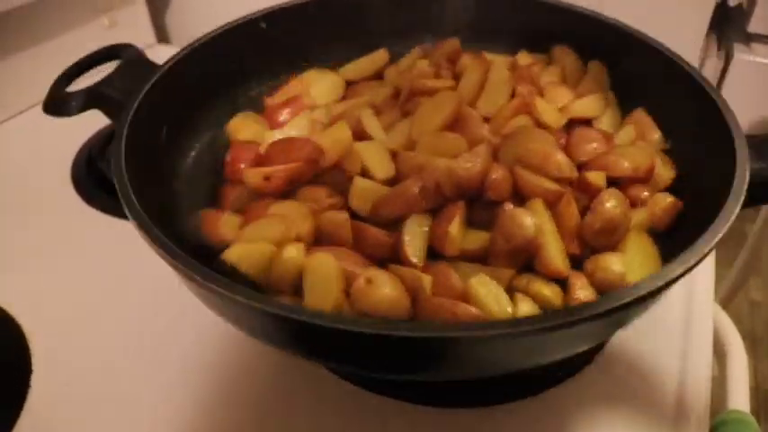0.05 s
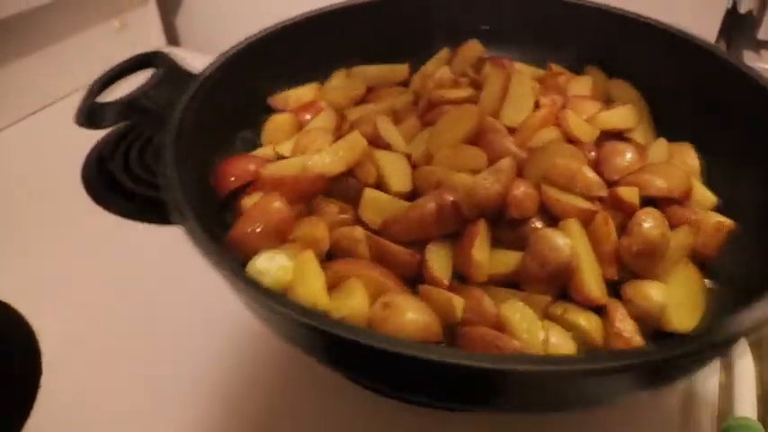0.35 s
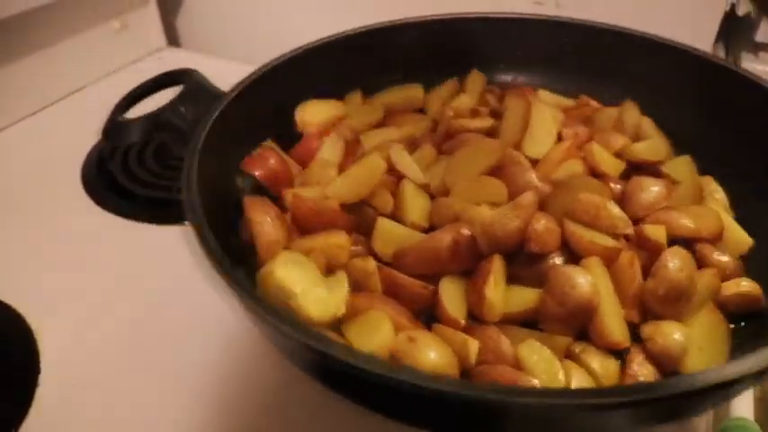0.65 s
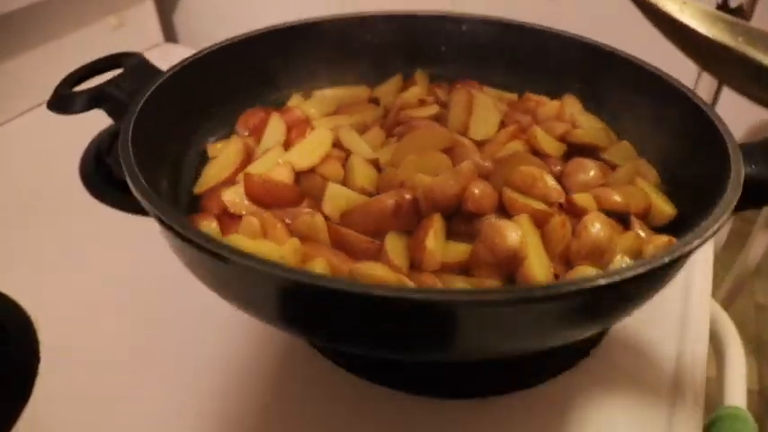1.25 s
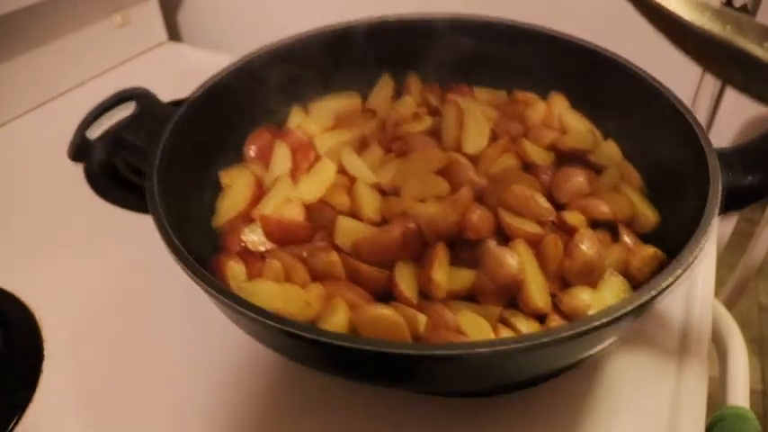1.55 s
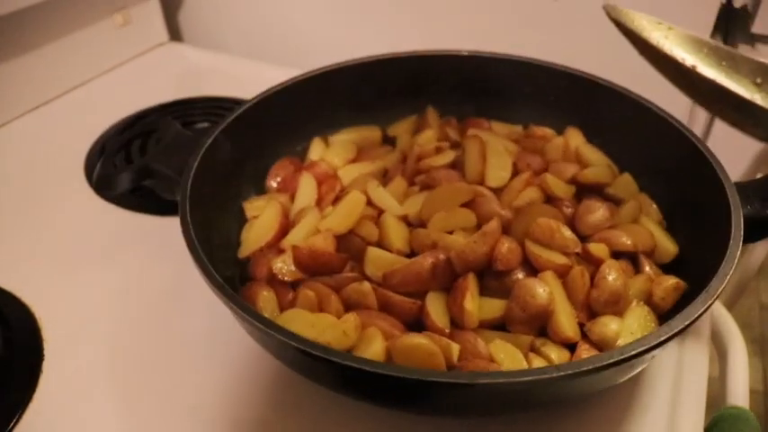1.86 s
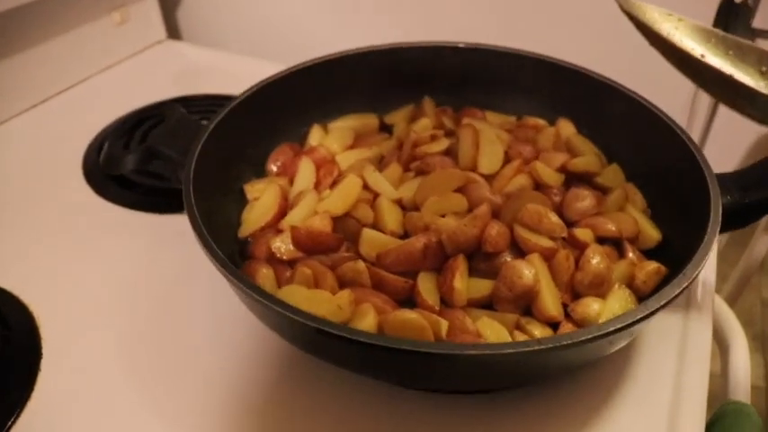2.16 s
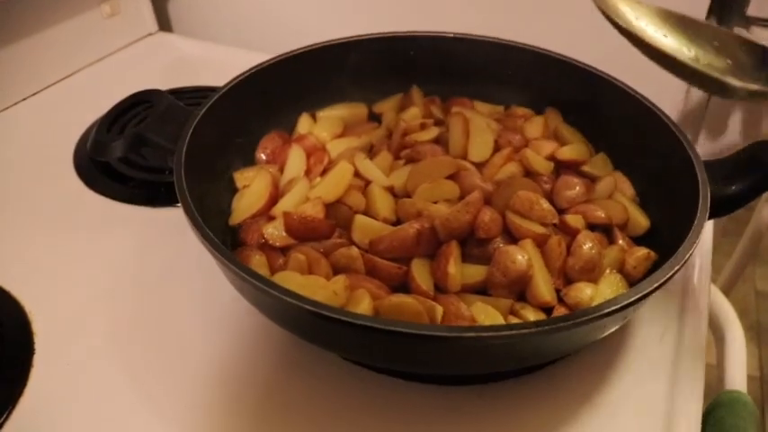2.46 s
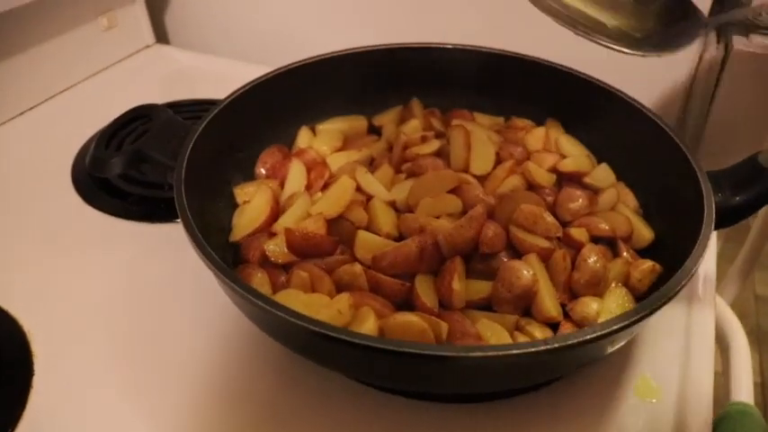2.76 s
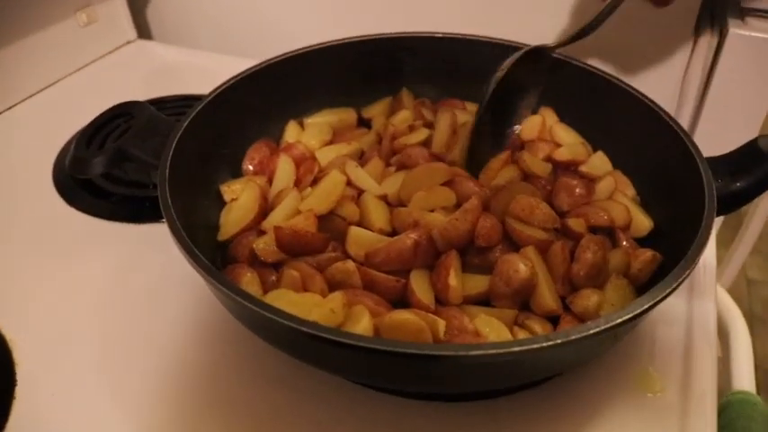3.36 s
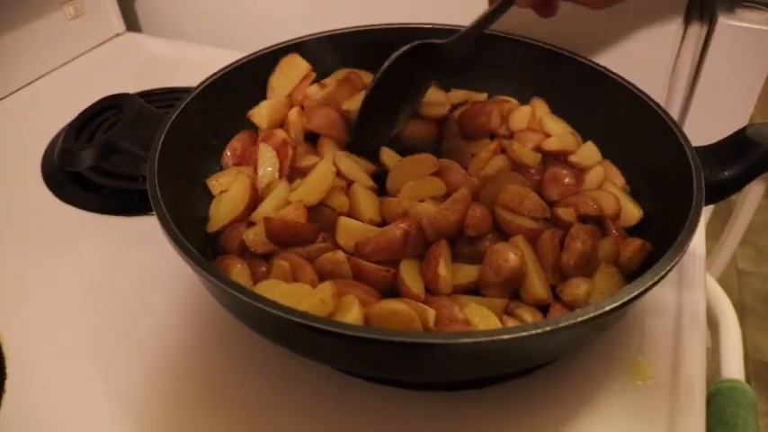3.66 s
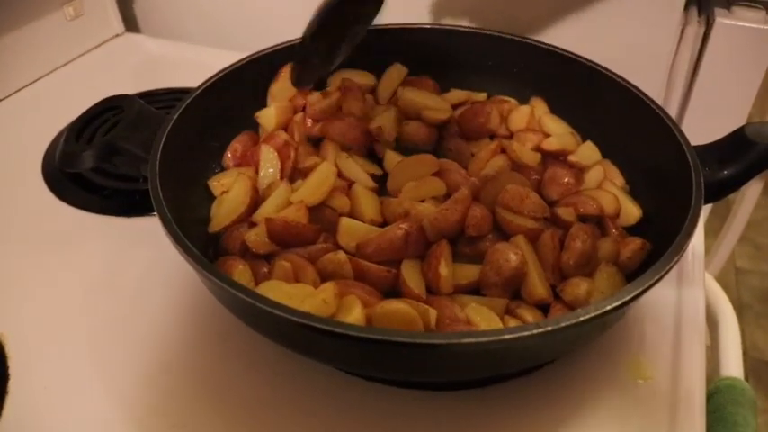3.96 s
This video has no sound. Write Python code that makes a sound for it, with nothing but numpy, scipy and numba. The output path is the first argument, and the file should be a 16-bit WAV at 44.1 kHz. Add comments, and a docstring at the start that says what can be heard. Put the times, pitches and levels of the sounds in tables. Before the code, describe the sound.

Potato wedges fry and spit in oil as the pan knocks and a spoon strikes it.

```python
"""Potato wedges frying in a pan

Countless steam bubbles burst and ring in the oil, merging into a sizzle, and single drops spit.
The pan knocks and slides on an electric burner; a spoon digs in and strikes it, exciting its modes.
An appliance hums behind. The limiter of a nearby phone ducks the sound after the loudest cracks."""
import sys
import numpy as np
from scipy import signal
from scipy.fft import rfft, irfft
from scipy.io import wavfile
from numba import njit

SR = 44100
rng = np.random.default_rng(int(sys.argv[2]) if len(sys.argv) > 2 else 0)


def put_to_file(sound):
    """Save the sound as 16-bit audio at rate SR, in the file named by the first command-line argument."""
    columns = np.atleast_2d(sound).T  # one column per channel
    safe = np.clip(columns, -1, 1)
    whole_steps = np.round(safe * 32767)
    wavfile.write(sys.argv[1], SR, whole_steps.astype(np.int16))


N = 176400


def sizzle():
    """Superposition: bursting films click, small bubbles ring, and the pan wall smears both into hiss."""
    # Spectral envelope of the frying. Each row: frequency in Hz, gain in dB.
    frying_spectrum = [(240, -23), (400, -10), (481, -11), (636, -7.5), (801, -7), (1600, -5), (1990, -4),
                       (2930, -2.5), (3750, -3), (4800, -3), (5960, -7), (8240, -4), (10500, -12.5),
                       (13500, -9), (16000, -23)]
    # Course of the sizzle. Each row: time in seconds, then low-mid, mid, treble and top level in dB.
    band_levels = [(0.0, -34.5, -23, -24.5, -31), (0.42, -34.5, -23.5, -26.5, -33),
                   (0.64, -33, -21.5, -26, -33.5), (0.8, -34, -24, -27, -34),
                   (1.85, -40.5, -27, -31.5, -39.5), (2.35, -34.5, -28, -31.5, -38.5),
                   (2.48, -39.5, -27.5, -32, -39.5), (3.52, -38.5, -27.5, -32, -39.5),
                   (4.0, -40, -27.5, -30.5, -37)]
    # The five edges of those four bands, in Hz.
    edges_hz = (300, 1500, 5500, 9500, 17000)
    # Gain added to each band's level, in dB.
    trims_db = (2.1, 0.18, 1.45, 1.6)
    bubbles_per_s, ring_cycles, bubble_db, wall_db = 2500, 82, -4.5, 1.5
    bubbles = np.zeros(N)
    for when, pitch, size in rng.random((int(bubbles_per_s * N / SR), 3)):
        hz = 500 + 15000 * pitch ** 1.5
        amplitude = hz ** .7 * undb(-3.4 * np.log(size + .002))  # many faint, a few loud
        add(bubbles, when * N / SR, amplitude * ring(hz, ring_cycles / hz, size=1024))
    fry = unit(clicks(per_s=14000, spread_db=3.2)) + undb(bubble_db) * unit(bubbles)
    smeared_power = signal.fftconvolve(fry ** 2, fade(t60=0.031, size=2048))[:N]
    scatter = np.sqrt(np.abs(smeared_power)) * noise()
    fry = fry + undb(wall_db) * unit(scatter)
    spectrum, freqs = rfft(colour(fry, frying_spectrum)), np.fft.rfftfreq(N, 1 / SR)
    times, *levels_db = np.array(band_levels).T
    out, t = np.zeros(N), np.arange(N) / SR
    for low, high, db, trim_db in zip(edges_hz, edges_hz[1:], levels_db, trims_db):
        part = irfft(spectrum * (freqs >= low) * (freqs < high), N)
        out += unit(part) * undb(np.interp(t, times, db) + trim_db)
    return out


def drop(hz, cycles, splash_db):
    """An oil drop snaps and splashes; bandwidth falls with ring time, so more cycles give clearer pitch."""
    snap = band(ring(hz, cycles / hz, size=8192), hz, width=1.1)
    splash = burst(hz, width=3.5 / cycles, t60=0.0096)
    return snap / np.max(np.abs(snap)) + undb(splash_db) * splash


def spits():
    """Impulsive sources: large drops burst singly, and smaller ones crackle at random between them."""
    # Each row: start in seconds, level in dB, pitch in Hz, cycles of ringing, relative splash in dB.
    large_drops = [(0.0213, -3, 8500, 9.3, -15), (0.1118, 1.5, 8300, 9, -17), (0.2161, 6, 3100, 8.8, -15),
                   (0.2166, -7.5, 1120, 2.5, -8), (0.2173, -4, 1800, 8.9, -7), (0.3102, -6, 4500, 8.6, -10),
                   (0.526, -11.5, 3000, 30, -7), (0.691, 6, 4370, 2.5, -8.5), (1.0863, -8, 11000, 6, -11),
                   (1.385, -1.5, 5160, 2.5, -13), (1.7028, -9, 7800, 48, -6),
                   (2.0227, -7.5, 5500, 10, -5.5), (2.2756, -3.5, 3500, 13, -10.5),
                   (2.4108, -4, 4370, 7.3, -12), (2.44, -9, 1900, 3.9, -8), (2.985, -7.5, 4670, 38, -5.5),
                   (3.1427, -6, 3070, 15, -2.5), (3.169, -5, 7800, 6.5, -12.5), (3.396, -7.5, 9200, 5, -14),
                   (3.759, -7, 7600, 7.4, -10.5), (3.82, -10, 7300, 11, -7), (3.871, -8, 3060, 5.3, -7),
                   (3.934, -11, 12000, 8, -8)]
    crackles_per_s, low_hz, high_hz = 22, 3150, 13000
    out = np.zeros(N)
    for start, db, hz, cycles, splash_db in large_drops:
        add(out, start, undb(db) * drop(hz, cycles, splash_db))
    for when, pitch, size in rng.random((int(crackles_per_s * N / SR), 3)):
        hz = low_hz * (high_hz / low_hz) ** pitch
        add(out, when * N / SR, undb(-19 + 8 * size) * drop(hz, cycles=5.7, splash_db=-24))
    return out


def simmer():
    """Bubble resonance: like-sized bubbles under the wedges fizz in one narrow band and die down."""
    # Each row: time in seconds, level in dB.
    fizz_levels = [(0, -34), (.4, -35), (.56, -30.5), (.8, -31.5), (1.55, -37), (1.8, -62), (4, -53)]
    fizz = unit(band(clicks(per_s=2500, spread_db=1.7), hz=2970, width=0.11))
    return fizz * undb(np.interp(np.arange(N) / SR, *np.array(fizz_levels).T))


def pan_ring(hz, width):
    """Modal response: a contact drives mainly the pan's modes in a band around hz; the peak is 1."""
    # Modes of the loaded pan. Each row: frequency in Hz, level in dB, 60 dB decay time in seconds.
    modes = [(220, -8, 0.065), (335, -9, 0.055), (465, 1, 0.052), (735, -2.5, 0.039), (1087, -5.5, 0.063),
             (1242, -0.5, 0.028), (1395, -0.5, 0.033), (1520, -6, 0.045), (1641, -4, 0.078),
             (2030, -11, 0.027), (3220, 0.5, 0.038), (4490, 3, 0.022), (4700, 4.5, 0.029)]
    body = np.zeros(8192)
    for mode_hz, db, t60 in modes:
        detune, polarity = rng.standard_normal(2)
        body += np.sign(polarity) * undb(db) * ring(mode_hz * (1 + 0.0059 * detune), t60, len(body))
    body = band(body, hz, width, order=2)
    return body / np.max(np.abs(body))


def knocks():
    """Impact excitation: the pan hits the burner with a dry crack and a ring damped by the food."""
    # Each row: start in seconds, level in dB, centre frequency of the contact in Hz.
    contacts = [(1.7855, -6, 1610), (1.787, -8, 600), (1.7937, -6, 430), (1.7983, -13, 1490),
                (1.822, -14, 550), (2.1276, -8.5, 1480), (2.133, -6, 1900), (2.1487, -11, 1340),
                (2.2255, -10, 1300), (2.2297, -11, 2090), (2.236, -15, 650), (2.286, -18, 900),
                (2.306, -18, 950), (2.3378, -19.5, 1830), (2.363, -20, 1200), (2.38, -24, 500),
                (2.401, -15.5, 1200)]
    out, width = np.zeros(N), 1.73
    for start, db, hz in contacts:
        crack = band(burst(hz, width, t60=0.038), hz=930, width=5.4, order=3) / 2
        add(out, start, undb(db) * (pan_ring(hz, width) + undb(2.5) * crack))
    return out


def spoon():
    """Damped and hard impacts: the spoon knocks through the potatoes, then clacks on the bare pan."""
    # Each row: start in seconds, level in dB, pitch in Hz, bandwidth as a share of the pitch,
    # 60 dB decay time in seconds, relative level of the pan's ring in dB.
    blows = [(3.579, 1, 1280, 0.91, 0.029, -1), (3.6236, 6, 3020, 1.7, 0.027, -21),
             (3.6252, -11, 280, 1.1, .012, -30), (3.625, 4.5, 5900, 0.087, 0.019, -35),
             (3.683, -20.5, 1140, 0.38, 0.032, -4)]
    out = np.zeros(N)
    for start, db, hz, width, t60, ring_db in blows:
        clack = band(burst(hz, width, t60), hz, width=2.5)
        add(out, start, undb(db) * (clack + undb(ring_db) * pan_ring(hz, width / 2)))
    return out


def slides():
    """Stick-slip friction: pan and spoon drag in many small catches."""
    # Each row: start and length in seconds, level in dB, centre in Hz, bandwidth as a share of it.
    drags = [(1.793, 0.14, -30, 473, 2.3), (2.214, 0.27, -30.5, 780, 3), (2.354, 0.085, -34, 95, 2.4),
             (3.59, 0.042, -23, 900, 0.39), (3.67, 0.058, -33.5, 870, 0.21), (3.709, 0.055, -32, 385, 0.47)]
    out, t, ramp_s = np.zeros(N), np.arange(N) / SR, 0.027
    for start, length, db, hz, width in drags:
        gate = np.clip(np.minimum(t - start, start + length - t) / ramp_s + .5, 0, 1)
        catches = clicks(per_s=500, spread_db=0.83)
        out += undb(db) * gate * unit(band(catches, hz, width, order=2))
    return out


def bumps():
    """Damped oscillations far down in the bass are heard as soft thuds."""
    # Each row: start in seconds, level in dB, pitch in Hz.
    thuds = [(1.83, -34, 40), (2.378, -32, 80), (2.835, -38.5, 36), (2.88, -39, 36), (3.39, -37, 35.7)]
    out = np.zeros(N)
    for start, db, hz in thuds:
        add(out, start, undb(db) * ring(hz, t60=0.17))
    return out


def appliance():
    """A line spectrum on a continuous one: steady motor tones over a hollow rush of air."""
    # Motor tones. Each row: frequency in Hz, rms level in dB.
    motor_tones = [(48.5, -54.5), (70, -52), (87.5, -55), (232, -53), (250, -60)]
    # Spectral envelope of the air. Each row: frequency in Hz, gain in dB.
    air_spectrum = [(25, -26), (60, -8), (115, -15), (142, -6), (180, -12.5), (215, -7), (245, 2),
                    (285, -4.5), (340, -9), (600, -22.5), (2000, -25)]
    t = np.arange(N) / SR
    hum = sum(np.sqrt(2) * undb(db) * np.sin(2 * np.pi * (hz * t + rng.random()))
              for hz, db in motor_tones)
    return hum + undb(-37) * unit(colour(noise(), air_spectrum))


def kitchen(x):
    """Reverberation: the dense reflections of a small room form a short, dull tail."""
    decay, top_hz = fade(t60=0.42), 2650
    tail = signal.sosfilt(signal.butter(2, top_hz, fs=SR, output="sos"), noise()) * decay
    return undb(-7.5) * signal.fftconvolve(x, tail / np.sqrt(np.sum(decay ** 2)))[:N]


def undb(db):
    """Amplitude ratio for a level in decibels."""
    return 10 ** (np.asarray(db) / 20)


def unit(x):
    """Normalisation to rms 1."""
    return x / np.sqrt(np.mean(x ** 2) + 1e-20)


def noise():
    """Gaussian white noise as long as the scene."""
    return rng.standard_normal(N)


def fade(t60, size=N):
    """Exponential decay by 60 dB in t60 seconds."""
    return np.exp(-np.log(1000) * np.arange(size) / SR / t60)


def ring(hz, t60, size=N):
    """Free vibration of one damped mode."""
    return np.sin(2 * np.pi * hz * np.arange(size) / SR) * fade(t60, size)


def band(x, hz, width, order=1):
    """Band-pass filtering around hz; the width is a share of hz."""
    edge = width / 2 + np.sqrt(1 + width ** 2 / 4)
    top = min(hz * edge, SR / 2 - 1000)
    return signal.sosfilt(signal.butter(order, [hz / edge, top], "band", fs=SR, output="sos"), x)


def colour(x, points):
    """Spectral shaping by (Hz, dB) points joined on a logarithmic frequency axis."""
    hz, db = np.array(points).T
    gain_db = np.interp(np.log(np.fft.rfftfreq(N, 1 / SR) + 1), np.log(hz), db)
    return irfft(rfft(x) * undb(gain_db), N)


def add(out, start, x):
    """Superposition of x on out, from start in seconds."""
    i = int(start * SR)
    out[i:i + len(x)] += x[:N - i]


def clicks(per_s, spread_db):
    """A Poisson train of impulses: many small, a few large."""
    occurs = rng.random(N) < per_s / SR
    size = np.minimum(rng.exponential(size=N), 7)
    return occurs * np.sign(noise()) * undb(spread_db * size)


def burst(hz, width, t60, size=8192):
    """An exponentially decaying band of noise that starts near rms 1."""
    decay = fade(t60, size)
    return unit(band(rng.standard_normal(size) * decay, hz, width)) * np.sqrt(np.mean(decay ** 2))


def scene():
    """Pressures add at one microphone, alike in both channels; knocks and spoon blows stir the room."""
    hits = knocks() + spoon()
    mono = sizzle() + simmer() + spits() + hits + kitchen(hits) + slides() + bumps() + appliance()
    return np.array([mono, mono])


@njit
def overshoot(x, threshold, attack_s, hold_s, release_s):
    """Envelope following: peaks over the threshold, as a ratio to it, rise fast, hold, then fall."""
    out, envelope, wait = np.empty(len(x)), threshold, 0.
    for i in range(len(x)):
        if x[i] > envelope:
            envelope += (x[i] - envelope) * min(1., 1 / (attack_s * SR))
            wait = hold_s * SR
        elif wait > 0:
            wait -= 1
        else:
            envelope += (threshold - envelope) / (release_s * SR)
        out[i] = envelope / threshold
    return out


def record(dry):
    """Peak limiting: the phone ducks after loud cracks, clips what still exceeds 1 and cuts the top."""
    threshold_db, slope, depth_db, top_hz = -3.5, 0.79, 7, 15850
    excess = overshoot(np.abs(dry[0]), undb(threshold_db), attack_s=0.00029, hold_s=0.045, release_s=0.016)
    gain = np.maximum(excess ** -slope, undb(-depth_db))
    low_pass = signal.ellip(10, .2, 70, top_hz, fs=SR, output="sos")
    return signal.sosfilt(low_pass, np.clip(dry * gain, -1, 1))


dry = scene()
out = record(dry)
put_to_file(out)
```